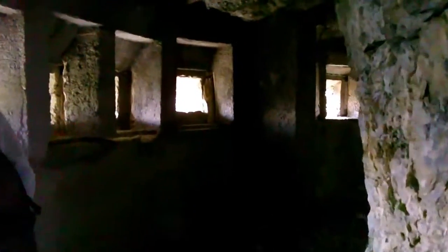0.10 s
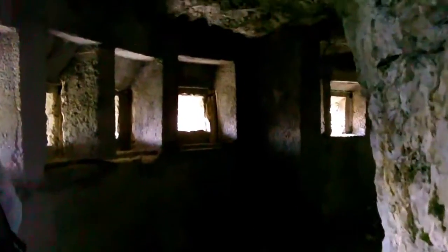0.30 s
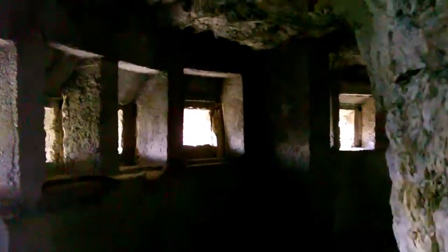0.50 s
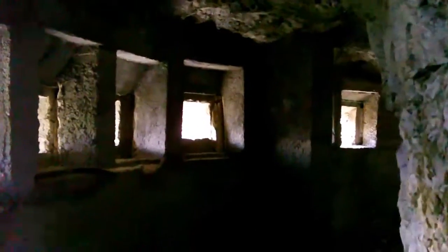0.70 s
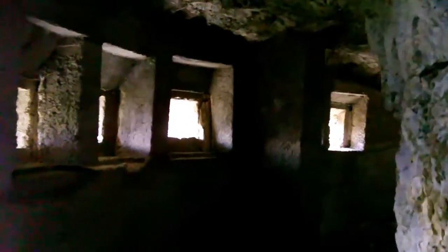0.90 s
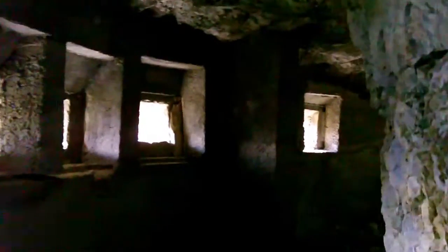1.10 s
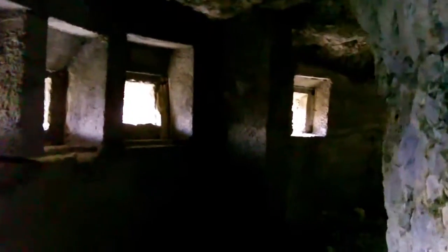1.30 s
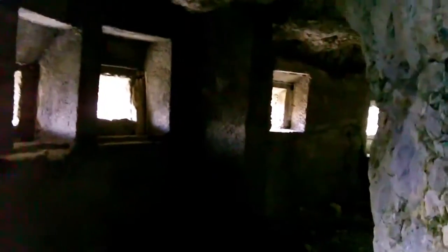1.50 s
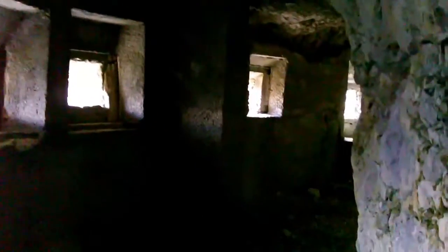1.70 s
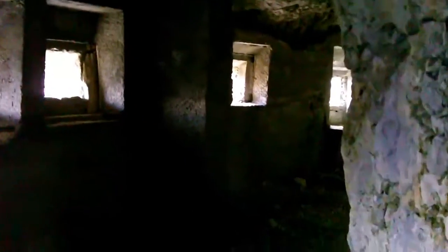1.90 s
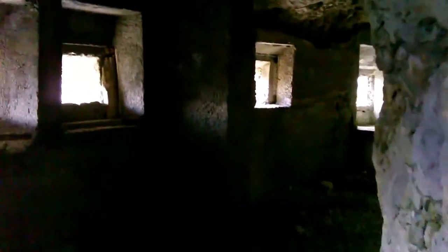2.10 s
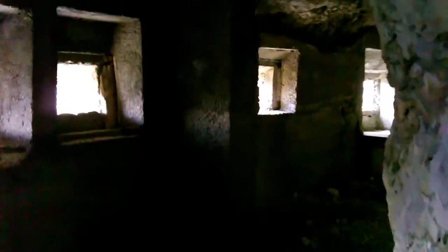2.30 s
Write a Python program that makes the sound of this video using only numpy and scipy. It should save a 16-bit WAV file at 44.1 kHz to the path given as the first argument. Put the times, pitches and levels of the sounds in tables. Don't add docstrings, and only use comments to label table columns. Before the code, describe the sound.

Slow boot steps scuff loose stones and gravel, heels thudding low, pebbles turning over after each step, in a dark rock chamber with a low murmur; steps heard left only, with noisy small-recorder hiss and faint whine.

```python
import sys
import numpy as np
from scipy import signal
from scipy.fft import rfft, irfft, next_fast_len
from scipy.io import wavfile
from scipy.ndimage import map_coordinates

SR = 44100
rng = np.random.default_rng(int(sys.argv[2]) if len(sys.argv) > 2 else 0)


def to_wav(sig):
    pcm = np.clip(np.atleast_2d(sig), -1, 1) * 32767
    pcm = np.round(pcm).astype(np.int16)
    wavfile.write(sys.argv[1], SR, pcm.T)


def rack_gain(trim_db):
    fader = np.asarray(trim_db, float)
    return 10 ** (fader / 20)


N = 103635


def unit(x):
    return x / np.sqrt(np.mean(x ** 2) + 1e-20)


def along(points, hz):
    f, value = np.transpose(points)
    return np.interp(np.log(hz + 1), np.log(f + 1), value)


def filtered(x, response):
    m = next_fast_len(N + 8192)
    return irfft(rfft(x, m) * response(np.fft.rfftfreq(m, 1 / SR)), m)[..., :N]


def noise(response, channels=1):
    m = next_fast_len(N + 8192)
    spectrum = rfft(rng.standard_normal((channels, m)))
    coloured = irfft(spectrum * response(np.fft.rfftfreq(m, 1 / SR)), m)[:, :N]
    return np.array([unit(c) for c in coloured])


def wobble(rate_hz):
    knots = rng.standard_normal(int(N * rate_hz / SR) + 4)
    return map_coordinates(knots, [np.arange(N) * rate_hz / SR])


def bursts(start_s, gain, hz, swell_s, size):
    t = np.arange(size) / SR
    u = t / swell_s[:, None]
    envelope = gain[:, None] * u * np.exp(1 - u)
    rows = envelope * np.sin(2 * np.pi * hz[:, None] * t)
    first = np.clip(np.round(start_s * SR).astype(int), 0, N)
    at = first[:, None] + np.arange(size)
    return np.bincount(at.ravel(), rows.ravel(), N + size + 1)[:N]


# time in seconds, pressure in dB.
PRESSURE = [(0, -56.5), (.12, -56), (.14, -67), (.2, -60), (.33, -39.5), (.48, -48.5), (.62, -53.5),
            (.97, -79), (1.03, -45.5), (1.13, -49), (1.23, -49.5), (1.28, -46.5), (1.36, -56), (1.6, -59.5),
            (1.98, -59.5), (2.02, -56.5), (2.2, -49.5), (2.35, -62.5)]


def rubble():
    stones, middle_hz, spread, cycles = 3000, 294, 0.677, 2.7
    size_db, tilt = 1.8, 0.092
    rumble_db, rumble_hz, rumble_growth = -49, 55, 0.19
    pressure_db = np.interp(np.arange(N) / SR, *np.transpose(PRESSURE))

    when, pitch = rng.random(stones), rng.standard_normal(stones)
    size = rng.exponential(size=stones)
    hz = np.clip(middle_hz * np.exp(spread * pitch), 90, 3000)
    gain = rack_gain(size_db * size) * (middle_hz / hz) ** tilt
    grind = unit(bursts(when * N / SR, gain, hz, cycles / hz / 2, size=2400))

    rumble = noise(lambda hz: hz / (1 + (hz / rumble_hz) ** 3) / (hz + 15))[0]
    swing_db = rumble_growth * (pressure_db - pressure_db.mean()) + 3 * wobble(6.74)
    return rack_gain(pressure_db + 5) * grind + rack_gain(rumble_db + swing_db) * rumble


# frequency in Hz, gain in dB.
AIR_COLOUR = [(22, 24), (40, -1), (150, -29), (380, 4), (800, -16), (2000, -16), (6000, -37)]


def murmur():
    level_db = -52 + 0.52 * wobble(7.8)
    return rack_gain(level_db) * noise(lambda hz: rack_gain(along(AIR_COLOUR, hz)))[0]


STEP_HZ = 1955.7

STEPPED_DB = [-53, -53.5]
# frequency in Hz, gain in dB.
STEPPED_COLOUR = [(20, 2.5), (60, -1), (150, -0.5), (400, -7), (1000, -11.5), (3000, -15.5), (8000, -23),
                  (15000, -16)]
HISS_DB = [-64, -67.5]
# frequency in Hz, gain in dB.
HISS_COLOUR = [(200, 15), (4000, -6), (5800, -4), (6800, 1), (7950, -5.5), (8800, 0.5), (12000, 1.5),
               (15000, -12.5)]
# pitch in Hz, left level in dB rms, right level in dB rms.
WHINE = [(1956, -89, -110), (5867, -87, -110), (7704, -96, -101), (7763, -89.5, -96), (7822, -85, -90.5),
         (7881, -84.5, -92), (7940, -96, -102), (9777, -83, -110), (9836, -79, -100), (11795, -89, -105)]


def electronics():
    notch_width, drift_rad = 0.48, 0.61

    def stepped_gain(hz):
        return rack_gain(along(STEPPED_COLOUR, hz)) * abs(np.sinc(hz / STEP_HZ)) ** notch_width

    stepped = noise(stepped_gain, channels=2)
    hiss = noise(lambda hz: rack_gain(along(HISS_COLOUR, hz)), channels=2)
    hz, *whine_db = np.transpose(WHINE)
    drift = drift_rad * wobble(6.5) * hz[:, None] / 8000
    turns = hz[:, None] * np.arange(N) / SR + rng.random((len(hz), 1))
    lines = np.sqrt(2) * np.sin(2 * np.pi * turns + drift)
    whine = rack_gain(np.array(whine_db)) @ lines
    return rack_gain(STEPPED_DB)[:, None] * stepped + rack_gain(HISS_DB)[:, None] * hiss + whine


# start in seconds, peak in dB, pitch in Hz, swell in ms.
THUDS = [(0.105, -58, 60, 3.4), (0.3375, -25.5, 129, 4.3), (0.563, -36.5, 43.5, 5.7),
         (0.7676, -29, 104, 5.3), (0.992, -35, 44, 6.8), (1.0194, -23, 141.4, 3.1),
         (1.0787, -29.5, 101, 5.3), (1.156, -35.5, 57, 14), (1.178, -28.5, 40, 5.3),
         (1.214, -40, 44.7, 8.5), (1.236, -42.5, 160, 4.5), (1.321, -33, 37.2, 18), (1.987, -36, 58.4, 3.8),
         (2.0006, -15, 240, 0.82), (2.0106, -16, 98, 1.73), (2.067, -46, 111, 1.2), (2.266, -36.5, 87, 5.6),
         (2.241, -34, 55, 12.6)]
# start in seconds, peak in dB, pitch in Hz, swell in ms.
STONES = [(.133, -31, 472, 1.64), (0.1565, -32, 515, 1), (.2158, -21, 498, 1.57), (.239, -34.5, 422, 2.9),
          (.2915, -30.5, 376, 4.1), (.2948, -17, 223, 4.5), (.314, -27, 230, 0.97),
          (0.3295, -20.5, 491, 2.03), (0.3383, -20.5, 228, 1), (0.3464, -21, 195, 2.15),
          (.357, -35, 375, 2.6), (.378, -30, 186, 7.4), (.407, -36.5, 274, 7.5), (0.4404, -26, 333, 1.04),
          (0.476, -38, 1050, 1.64), (1.019, -29, 403, 1.33), (1.026, -34, 860, 2), (1.0513, -34, 564, 2.45),
          (1.068, -35.5, 593, 4.2), (1.237, -34.5, 545, 2.85), (1.2635, -28.5, 576, 1.95),
          (1.279, -34, 910, 2.2), (2.0037, -24, 339, 1.8), (2.005, -34.5, 620, 1.9), (2.137, -35, 973, 2.1),
          (2.21, -46.5, 1330, 2.2), (2.151, -39, 1180, 1.04), (1.2368, -43, 3270, 0.52),
          (1.025, -49, 2780, 1.5)]


def knocks():
    partner_db, partner_fall_db, partner_ratio, partner_spread = -20, 4, 1.6, 0.4
    start_s, db, hz, swell_ms = np.transpose(STONES + THUDS)
    out = bursts(start_s, rack_gain(db), hz, swell_ms / 1000, size=5000)
    offsets = rng.uniform(-1.15, 1.576, (len(start_s), 4))
    delays = rng.random((len(start_s), 4))
    for offset, delay in zip(offsets.T, delays.T):
        partner_s = start_s + 1.705 * delay * swell_ms / 1000
        gain = rack_gain(db + partner_db - partner_fall_db * offset)
        partner_hz = hz * partner_ratio * np.exp(partner_spread * offset)
        out += bursts(partner_s, gain, partner_hz, swell_ms / 1500, size=3000)
    return out


# start in seconds,
# length in seconds, level in dB, middle pitch in Hz.
GRIT = [(0.131, 0.073, -50.5, 910), (0.137, 0.066, -44.5, 206), (0.326, 0.042, -59.5, 1370),
        (0.446, 0.077, -59, 950), (1.019, 0.026, -43.5, 730), (.214, 0.013, -60, 1850),
        (0.33, 0.0062, -49, 1450), (0.219, 0.046, -51, 925), (0.211, 0.04, -54, 239),
        (0.466, 0.029, -52, 1155), (0.763, 0.02, -50, 1204), (0.77, 0.031, -45.5, 240),
        (1.024, 0.0082, -48.5, 3100), (1.179, 0.19, -59.5, 1614), (1.043, 0.03, -60.5, 3330),
        (1.148, 0.072, -63.5, 2660), (1.184, 0.008, -58, 2330), (.329, 0.012, -60.5, 2860),
        (.76, 0.023, -46.5, 563), (0.763, 0.023, -62.5, 3140), (1.234, .03, -45, 767),
        (1.262, 0.059, -58, 634), (1.263, 0.043, -47.5, 1000), (1.265, 0.022, -56, 3160),
        (1.999, 0.023, -43.5, 657), (1.997, 0.0059, -45.5, 1160), (2.137, 0.0072, -55.5, 3200),
        (2.15, 0.048, -58.5, 1205), (2.151, 0.02, -61.5, 2700), (2.21, 0.013, -60, 1290),
        (0.331, 0.016, -56.5, 4780),
    (0.337, 0.017, -55.5, 8800),
    (0.765, 0.019, -60.5, 7260),
    (1.024, 0.034, -62.5, 6500),
    (1.07, 0.0093, -61.5, 7940),
    (1.15, 0.028, -67.5, 7000),
    (1.262, 0.028, -64, 7360),
    (1.286, 0.017, -64.5, 6000),
    (2.15, .03, -69.5, 6130),
]


def grit():
    grains, grains_per_s, cycles = 150, 9000, 4
    spread, size_db, fade = 0.3, 2, 0.45
    out = np.zeros(N)
    for start_s, length_s, db, middle_hz in GRIT:
        when, pitch = rng.random(grains), rng.uniform(-0.84, 1, grains)
        size = rng.exponential(size=grains)
        hz = np.clip(middle_hz * np.exp(spread * pitch), 100, 15000)
        live = np.clip(grains_per_s * length_s + 6 - np.arange(grains), 0, 1)
        grain_s = start_s - np.log(1 - 0.95 * when) * fade * length_s
        ring = int(4 * cycles * SR / middle_hz)
        shower = bursts(grain_s, live * rack_gain(size_db * size), hz, cycles / hz / 3, size=ring)
        out += shower * rack_gain(db) * np.sqrt(length_s * SR / np.sum(shower ** 2))
    return out


# start in seconds, peak in dB, pitch in Hz, swell in ms.
MORE_STONES = [(.14, -51, 267, 2.3), (.166, -29.5, 378, 1.2), (.171, -37, 564, 1.7), (.194, -43, 810, 1.7),
               (.2225, -31, 260, 2), (.2285, -23.5, 340, 0.72), (.252, -43, 700, 1.2), (.319, -27.5, 230, 1.4),
               (.333, -36.5, 1000, 1.5), (.341, -35.5, 630, 1.2), (.346, -43, 965, 3), (.364, -39, 520, 1.3),
               (.372, -31, 203, 2.5), (.397, -33, 205, 6.4), (.4115, -30, 400, 1.8), (.449, -32.5, 475, 2.1),
               (.455, -36.5, 376, 1.3), (.469, -39, 484, 1.5), (.385, -47, 535, 2.9), (.484, -37.5, 555, 1.9),
               (.497, -47, 756, 1.5), (.351, -30, 278, 2.3), (.542, -32.5, 252, 2.2), (.759, -39, 200, 2.4),
               (.476, -36.5, 700, 0.81), (1.024, -46, 1690, 1.4), (1.032, -27, 396, 1.1),
               (1.064, -40, 151, 4.3), (1.0803, -33.5, 214, 1.7), (1.0272, -32.5, 550, 0.56),
               (1.053, -48, 1340, 1.7), (1.085, -39, 560, 1), (1.117, -37.5, 324, 1.8), (1.191, -37.5, 323, 2),
               (1.222, -41, 600, 2.3), (1.268, -33.5, 860, 1.1), (1.276, -42, 427, 1),
               (1.284, -32.5, 513, 0.89), (1.29, -34.5, 305, 4), (1.2945, -40, 460, 2.1),
               (1.306, -35, 487, 0.81), (1.413, -41, 320, 3.6), (1.644, -41, 342, 1.8), (2.002, -34, 842, 1.64),
               (2.0015, -51, 1480, 0.74), (2.023, -28, 332, 1.4), (2.065, -31.5, 112, 2.6),
               (2.19, -37.5, 148, 4.3), (2.028, -30.5, 223, 2.4), (2.055, -38, 300, 1.8),
               (2.128, -42.5, 780, 1.8), (2.2, -37, 394, 2.8)]


def more_knocks():
    start_s, db, hz, swell_ms = np.transpose(MORE_STONES)
    return bursts(start_s, rack_gain(db), hz, swell_ms / 1000, size=2000)


# frequency in Hz, 60 dB decay time in seconds.
TUNNEL_DECAY = [(100, 1), (400, 0.44), (1500, 0.83), (6000, 0.29)]


def tunnel(x):
    wall_delay_s, hop = 0.012, SR // 8
    out = np.zeros(N + 2 * SR)
    for a in range(0, N, hop):
        hz, t, z = signal.stft(rng.standard_normal(SR // 2 + SR // 4), SR, nperseg=256)
        decay = rack_gain(-60 * t / along(TUNNEL_DECAY, hz)[:, None])
        tail = signal.istft(z * decay, SR, nperseg=256)[1]
        wet = signal.fftconvolve(x[a:a + hop], tail / np.linalg.norm(tail))
        out[a + int(wall_delay_s * SR):][:len(wet)] += wet
    return out[:N]


def scene():
    hits = knocks() + more_knocks() + grit()
    left = hits + rack_gain(-10) * tunnel(hits) + rubble() + murmur()
    return np.array([left, np.zeros(N)])


def microphone(hz):
    low_cut_hz, port_hz, port_width_hz, port_gain = 61, 1790, 270, 0.27
    z = np.exp(-2j * np.pi * hz / STEP_HZ) * np.clip(hz / 1000 - 0.5, 0, 1)
    dips = (1 - 0.8 * z) / (1 - 0.55 * z)
    damping = 1j * hz * port_width_hz
    port = 1 + port_gain * damping / (port_hz ** 2 - hz ** 2 + damping)
    return 1j * hz / (low_cut_hz + 1j * hz) * dips * port


def top_cut(hz):
    top_hz, slope_hz = 15270, 120
    return 1 / (1 + np.exp(np.clip((hz - top_hz) / slope_hz * 4, -50, 50)))


def roll_off(x):
    return signal.sosfilt(signal.butter(12, 15490, fs=SR, output="sos"), x)


def record(dry):
    mix = filtered(filtered(dry, microphone) + electronics(), top_cut)
    return roll_off(mix)


dry = scene()
out = record(dry)
to_wav(out)
```